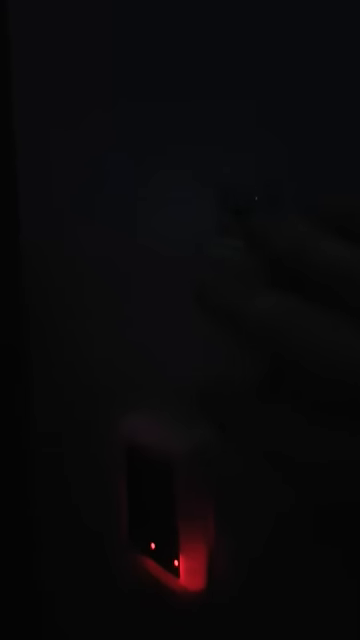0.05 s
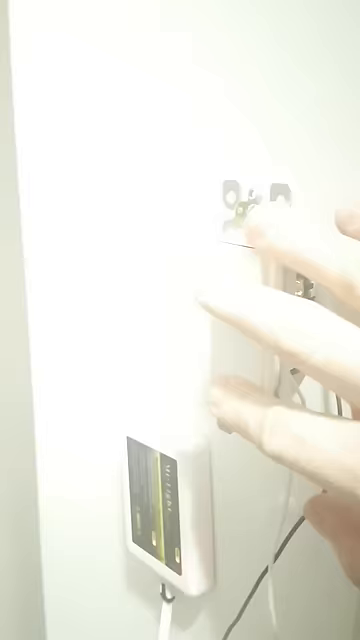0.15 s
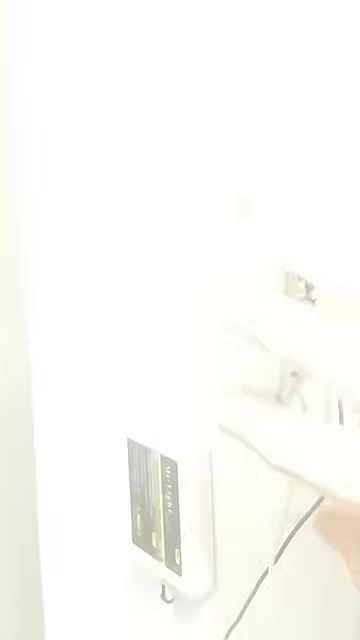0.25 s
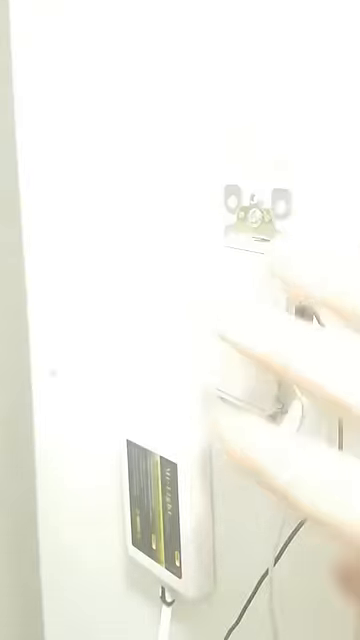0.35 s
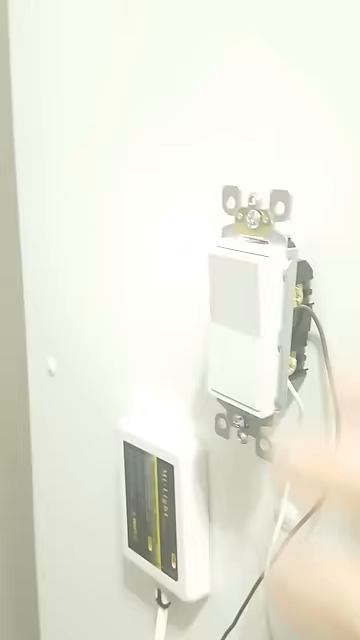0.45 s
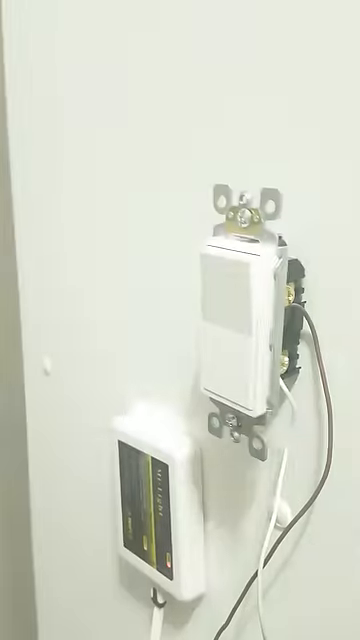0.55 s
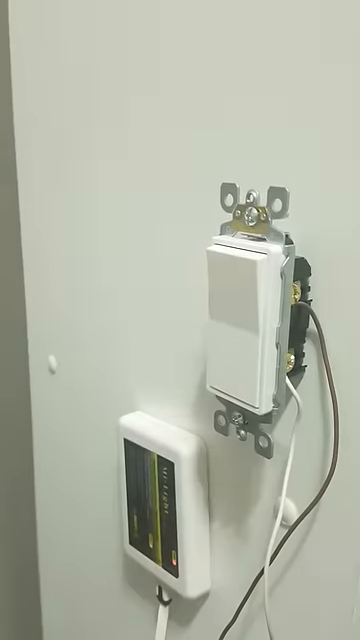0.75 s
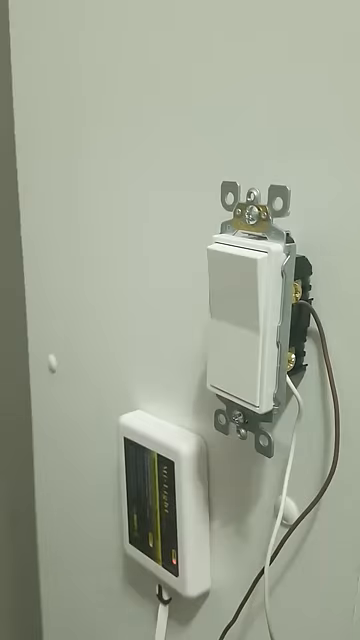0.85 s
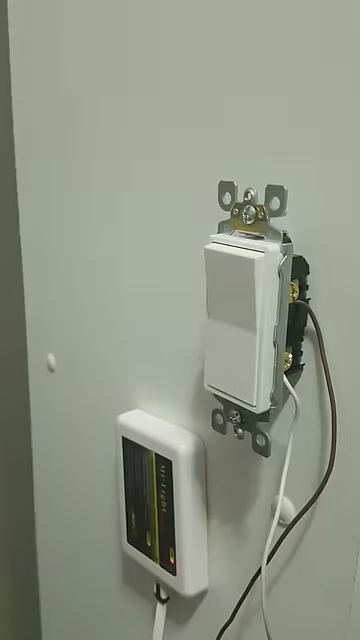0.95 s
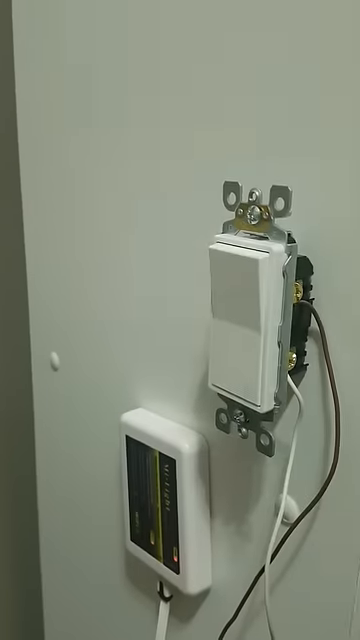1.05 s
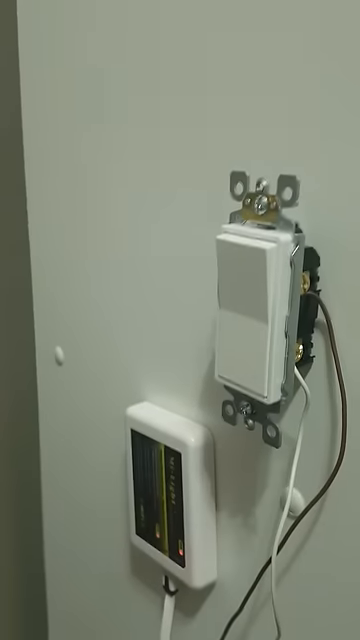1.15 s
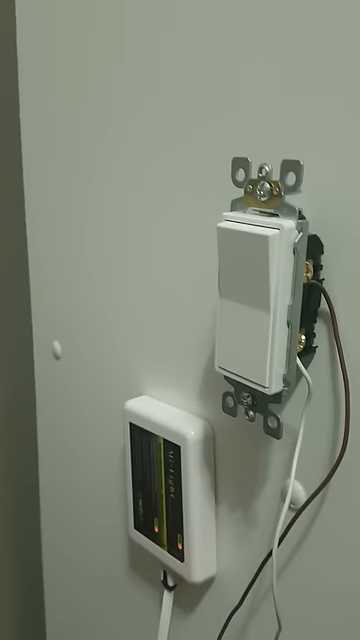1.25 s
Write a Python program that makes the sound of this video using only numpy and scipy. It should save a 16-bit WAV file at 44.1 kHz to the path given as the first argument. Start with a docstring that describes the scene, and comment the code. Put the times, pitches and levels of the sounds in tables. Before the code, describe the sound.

A rocker light switch clicks once, hard and close, then fingers slide off with a short scrape, rattle and soft brush, leaving quiet low room rumble on a hand-held phone microphone in stereo.

```python
"""Rocker switch in a small room

A plastic rocker switch snaps on close to a hand-held phone: short noise cracks and damped body modes.
Fingers slide off, scrape and rattle the loose housing, and the hand brushes away: grainy friction noise,
part of it ringing through housing and strap modes. A soft wall boom, handling bumps, low room rumble
and a faint wavering hum, all made of noise or a drifting tone, lie under it in stereo."""
import sys
import numpy as np
from scipy import signal
from scipy.fft import rfft, irfft
from scipy.io import wavfile
from scipy.ndimage import uniform_filter1d

SR = 44100
rng = np.random.default_rng(int(sys.argv[2]) if len(sys.argv) > 2 else 0)


def generate_wav(sig):
    """Save sig (samples, or channels by samples) to the path in sys.argv[1] as 16-bit PCM at SR."""
    pcm = np.round(np.clip(np.atleast_2d(sig).T, -1, 1) * 32767).astype(np.int16)
    wavfile.write(sys.argv[1], SR, pcm)


N = 57330  # length in samples, 1.3 s


def undb(db):
    """Decibels to amplitude gain."""
    return 10 ** (np.asarray(db) / 20)


def unit(x):
    """Scale to rms 1, over all channels together."""
    return x / np.sqrt(np.mean(x ** 2))


def curve(points, hz):
    """Read (Hz, value) points on a log-frequency axis."""
    point_hz, value = np.array(points, float).T
    return np.interp(np.log(np.maximum(hz, 1)), np.log(point_hz), value)


def bins():
    """Frequencies in Hz of the spectrum of a whole signal."""
    return np.arange(N // 2 + 1) * SR / N


def colour(x, points):
    """Filter by (Hz, dB) points."""
    return irfft(rfft(x) * undb(curve(points, bins())), N)


def balance(x, points):
    """Lean each frequency to the left (positive dB) or the right (negative dB)."""
    db = curve(points, bins())
    left_right = undb(np.array([db, -db]) / 2)
    return irfft(rfft(x) * left_right, N)


def pair(likeness):
    """White noise at the two microphones; likeness is their correlation, a number or one per frequency."""
    likeness = np.clip(likeness, -1, 1)
    mid, side = rfft(rng.standard_normal((2, N)))
    mid = mid * np.sqrt((1 + likeness) / 2)
    side = side * np.sqrt((1 - likeness) / 2)
    return irfft(np.array([mid + side, mid - side]), N)


def walk(rate):
    """Random drift of rms 1, heading for a new value 'rate' times a second."""
    step = int(SR / rate)
    stairs = np.repeat(rng.standard_normal(N // step + 1), step)
    return unit(uniform_filter1d(stairs, step)[:N])


def decay(t, t60):
    """Exponential fall of 60 dB in t60 seconds."""
    return np.exp(-np.log(1000) * t / t60)


def envelope(start, attack, hold, t60, db):
    """Straight rise, hold, exponential release."""
    t = np.arange(N) / SR - start
    rise = np.clip(t / attack, 0, 1)
    return undb(db) * rise * decay(np.maximum(t - attack - hold, 0), t60)


def ring(modes, start=0):
    """Damped modes struck at one moment."""
    t = np.maximum(np.arange(N) / SR - start, 0)
    return sum(undb(db) * decay(t, t60) * np.sin(2 * np.pi * hz * t) for hz, db, t60 in modes)


def convolve(x, response):
    """Pass each channel through its impulse response."""
    return signal.fftconvolve(x, response, axes=-1)[:, :N]


# Short hard contact of the rocker, just after the crack begins.
# The row: start in seconds, attack in seconds, hold in seconds, t60 in seconds, level in dB before colour.
HARD_CONTACT = (.1939, .0002, .0006, .003, -15)
# Colour of the crack close to the switch. Each row: frequency in Hz, gain in dB.
SNAP_COLOUR = [(60, -38), (170, -20), (450, -24), (680, -16), (1000, -15), (1730, -12), (2400, -9),
               (3050, -1.5), (3800, -5.5), (4500, -11.5), (5300, -7.5), (7000, -4), (9500, -11),
               (11200, -12), (12400, -9), (13300, -4), (14200, -10), (15500, -12)]
# Modes of the switch body. Each row: frequency in Hz, level in dB relative to the ring, t60 in seconds.
SWITCH_MODES = [(630, -6.5, .095), (813, -7, .09), (1185, -13, .11), (1293, -13, .16), (1765, -5, .12),
                (2127, -10, .09), (2880, -3, .04), (3050, -4, .04), (3180, -5, .06), (3550, -10, .05),
                (3895, -7, .08), (6950, -3, 0.031), (8100, -7, 0.035), (13300, -6, .02)]
SNAP_S, SNAP_DB = .1937, -17.5  # start, and level before colour
SNAP_ATTACK_S, SNAP_HOLD_S, SNAP_T60_S = .0004, .00067, .038
RING_DB = -34


def snap():
    """The rocker flips over: a dense short crack, a hard contact, and the ringing of the switch body."""
    crack_shape = envelope(SNAP_S, SNAP_ATTACK_S, SNAP_HOLD_S, SNAP_T60_S, SNAP_DB)
    shape = envelope(*HARD_CONTACT) + crack_shape
    crack = colour(pair(likeness=.2) * shape, SNAP_COLOUR)
    low_cut = signal.butter(2, 400, "highpass", fs=SR, output="sos")
    body = signal.sosfilt(low_cut, ring(SWITCH_MODES, SNAP_S + SNAP_ATTACK_S))
    return crack + undb(RING_DB) * body


GRAINS_PER_S, GRAIN_SPREAD_DB, RUB_LIKENESS = 2500, 3.3, .2


def rub(strokes, points, rough):
    """Friction: tiny slips of uneven size over a smooth hiss, swelling with each stroke."""
    slip_times = rng.random(N) < GRAINS_PER_S / SR
    slips = slip_times * undb(GRAIN_SPREAD_DB * rng.standard_normal(N))
    hiss = pair(RUB_LIKENESS)
    contact = hiss + rough * unit(slips * pair(RUB_LIKENESS))
    return unit(colour(contact, points)) * sum(envelope(*row) for row in strokes)


def ring_along(friction, modes, db):
    """Friction drives a resonant part, which rings at db relative to the friction."""
    ringing = unit(convolve(friction, ring(modes)[None]))
    return friction + undb(db) * np.std(friction) * ringing


# Skin sliding on the plastic, close to the phone. Each row: start in seconds, attack in seconds,
# hold in seconds, t60 in seconds, level in dB before the room.
SLIDES = [(.205, 0.011, .032, .15, -50.8), (.246, .021, .035, .16, -43.6)]
# Colour of skin on plastic. Each row: frequency in Hz, gain in dB.
SLIDE_COLOUR = [(100, -20), (500, -12), (1000, -7), (1500, -6), (3200, 1), (4500, -6.5), (6200, 2),
                (8500, -3), (10000, -7.5), (12800, -1.5), (15500, -8)]


def slide():
    """The fingers slide off the rocker: friction with the slips weaker than the hiss."""
    return rub(SLIDES, SLIDE_COLOUR, rough=.54)


# Scrapes and rattles of the housing. Each row: start in seconds, attack in seconds, hold in seconds,
# t60 in seconds, level in dB before chatter and room.
SCRAPES = [(.2905, .007, .011, .18, -36.2), (.331, 0.0026, 0.0025, 0.032, -45),
           (.353, 0.0011, 0.0023, 0.036, -49)]
# Colour of the scraping. Each row: frequency in Hz, gain in dB.
SCRAPE_COLOUR = [(120, -26), (300, -15), (600, -13), (950, -5.5), (1500, -4.5), (2100, 0), (2600, -4),
                 (4200, -5), (5200, -13), (8300, -15), (10000, -23), (15000, -28)]
# Modes of the loose housing. Each row: frequency in Hz, level in dB relative to each other, t60 in seconds.
HOUSING_MODES = [(1022, -7, .15), (1088, -4, 0.32), (1269, -2, .25), (2050, -3, .08), (2100, 0, .18),
                 (2339, -2, .2), (2637, -4, .2), (2935, -4, .2), (3440, -5, .2), (6080, -3, .2)]
HOUSING_DB = -9  # ringing relative to the scrape
CHATTER_DB, CHATTER_PER_S = 1.2, 400  # rms spread and rate of the level flutter


def housing():
    """Rough scraping with a fluttering level sets the loose housing ringing."""
    chatter = undb(CHATTER_DB * walk(CHATTER_PER_S))
    scrape = rub(SCRAPES, SCRAPE_COLOUR, rough=1.1) * chatter
    return ring_along(scrape, HOUSING_MODES, HOUSING_DB)


# The hand brushes away. Each row: start in seconds, attack in seconds, hold in seconds, t60 in seconds,
# level in dB before the treble change and the room, treble gain in dB.
BRUSHES = [(.396, .025, .016, .18, -44.3, 0), (.453, .033, .026, .16, -51.7, -5)]
# Colour of the brushing. Each row: frequency in Hz, gain in dB.
BRUSH_COLOUR = [(100, -18), (280, -4), (650, -9), (950, 0), (1350, -5), (2050, 2), (3000, .5), (4700, -7),
                (6800, -4.5), (7500, 1), (8500, 4), (9400, -6), (12700, 0), (15500, -9)]
# Thin ring of the switch's metal strap. Each row: frequency in Hz, level in dB relative to each other,
# t60 in seconds.
STRAP_MODES = [(7310, -3, .3), (7490, -2, .3), (7700, -2, .3), (8190, 0, .35), (8340, 0, .35),
               (8600, -3, .35)]
STRAP_DB = -10  # ringing relative to the brushing
TREBLE_FROM_HZ, TREBLE_FULL_HZ = 9000, 12000


def brush():
    """The hand brushes away in two strokes, the second with less treble; the metal strap rings along."""
    hiss = 0
    for *stroke, treble_db in BRUSHES:
        friction = rub([stroke], BRUSH_COLOUR, rough=.7)
        hiss = hiss + colour(friction, [(TREBLE_FROM_HZ, 0), (TREBLE_FULL_HZ, treble_db)])
    return ring_along(hiss, STRAP_MODES, STRAP_DB)


PORT_LAG_S = .00033


def ports(x):
    """Sound from the switch reaches the left microphone a little later than the right."""
    half_lags = PORT_LAG_S / 2 * np.array([[1], [-1]])
    return irfft(rfft(x) * np.exp(-2j * np.pi * bins() * half_lags), N)


ROOM_DB, ROOM_BUILD_S = -5.3, .0033  # reverb level, and rise time of the reflections
ROOM_LOW_T60_S, ROOM_HIGH_T60_S = .5, .25
ROOM_BASS_LIKENESS, ROOM_LIKE_HZ = .7, 600  # likeness halves at this frequency


def room(x):
    """Dense reflections from near walls; the treble dies sooner."""
    t, response = np.arange(N) / SR, 0
    centres = np.geomspace(125, 16000, 8)
    t60s = np.linspace(ROOM_LOW_T60_S, ROOM_HIGH_T60_S, len(centres))
    noise = rfft(pair(ROOM_BASS_LIKENESS / (1 + (bins() / ROOM_LIKE_HZ) ** 2)))
    # overlapping bands, each full at its own centre and silent at the next
    for share, t60 in zip(np.eye(len(centres)), t60s):
        band = irfft(noise * curve(list(zip(centres, share)), bins()), N)
        response = response + band * decay(t, t60)
    response = response * np.clip(t / ROOM_BUILD_S, 0, 1)
    return x + undb(ROOM_DB) * convolve(x, unit(response) / np.sqrt(N))


# Boom of the wall panel behind the switch. The row: start in seconds, attack in seconds, hold in seconds,
# t60 in seconds, level in dB.
PANEL_BOOM = (.195, .010, .014, .45, -51.5)
# Colour of the boom. Each row: frequency in Hz, gain in dB.
PANEL_COLOUR = [(70, -30), (130, -14), (185, 0), (260, -1), (370, -13), (600, -12), (1000, -22),
                (3000, -50)]


def panel():
    """The wall behind the switch answers with a soft, low boom of shaped noise."""
    return unit(colour(pair(likeness=.8), PANEL_COLOUR)) * envelope(*PANEL_BOOM)


# Handling bumps on the phone itself. Each row: start in seconds, attack in seconds, hold in seconds,
# t60 in seconds, level in dB before the left-right lean.
BUMPS = [(0.181, 0.0061, 0.0037, .05, -61), (0.352, 0.0043, .012, 0.13, -61),
         (0.436, 0.0034, 0.0044, .07, -55), (0.484, 0.0026, 0.0068, .12, -57),
         (0.613, 0.0048, 0.021, 0.1, -61), (.812, .012, .025, .14, -61), (1.063, 0.0059, .004, 0.036, -56),
         (1.154, .005, 0.036, 0.13, -65), (1.274, 0.0027, 0.0073, .06, -61)]
# Colour of the bumps. Each row: frequency in Hz, gain in dB.
BUMP_COLOUR = [(25, -12), (60, -3), (110, -0.5), (220, -4), (350, -17), (900, -29), (3000, -63)]
BUMP_PAN_DB = -10  # left relative to right


def bumps():
    """Dull knocks from the grip on the phone, mostly at the right microphone."""
    thud = unit(colour(pair(likeness=.42), BUMP_COLOUR)) * sum(envelope(*row) for row in BUMPS)
    return thud * undb(np.array([[BUMP_PAN_DB], [-BUMP_PAN_DB]]) / 2)


# Colour of the quiet room around the phone. Each row: frequency in Hz, gain in dB.
AIR_COLOUR = [(15, -44), (25, -15.5), (104, -5), (183, -3.5), (267, -11), (445, -6.5), (552, -12),
              (598, -9.5), (826, -15), (895, -12.5), (1020, -18.5), (1300, -19.5), (2230, -23),
              (6730, -34.5), (15500, -33)]
# Left-right balance of the room noise. Each row: frequency in Hz, left relative to right in dB.
AIR_BALANCE = [(30, -8), (70, -8), (150, -2), (400, -3.5), (15000, -0.5)]
AIR_DB, AIR_LIKENESS, AIR_LIKE_HZ = -63.8, .55, 1200  # likeness halves at this frequency
HUM_HZ, HUM_DB = 587.6, -76.5  # centre pitch, rms level


def air():
    """Room rumble, partly alike at both microphones in the bass, with hiss and a faint wavering hum."""
    noise = colour(pair(AIR_LIKENESS / (1 + (bins() / AIR_LIKE_HZ) ** 2)), AIR_COLOUR)
    hum_hz = HUM_HZ * (1 + .0031 * walk(11.86))
    hum = np.sin(2 * np.pi * np.cumsum(hum_hz) / SR) * undb(3.4 * walk(8.7))
    return undb(AIR_DB) * unit(balance(noise, AIR_BALANCE)) + undb(HUM_DB) * unit(hum)


# Left-right balance of the microphones for sounds at the switch.
# Each row: frequency in Hz, left relative to right in dB.
MIC_BALANCE = [(200, -4), (1200, 0.5), (4000, -0.5), (8000, 0.5), (12000, 3.5), (15000, 4)]


def scene():
    """Switch and hand sound in the room; wall boom, bumps and room noise lie under them."""
    at_switch = snap() + slide() + housing() + brush()
    in_room = balance(room(ports(at_switch)), MIC_BALANCE)
    return in_room + panel() + bumps() + air()


TOP_HZ = 15800


def record(dry):
    """The phone cuts the top of the treble with a steep low-pass."""
    top_cut = signal.ellip(10, .2, 70, TOP_HZ, fs=SR, output="sos")  # ripple and rejection in dB
    return signal.sosfilt(top_cut, dry)


dry = scene()
out = record(dry)
generate_wav(out)
```